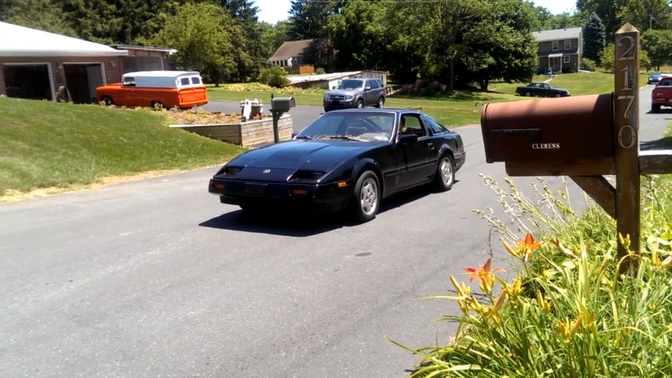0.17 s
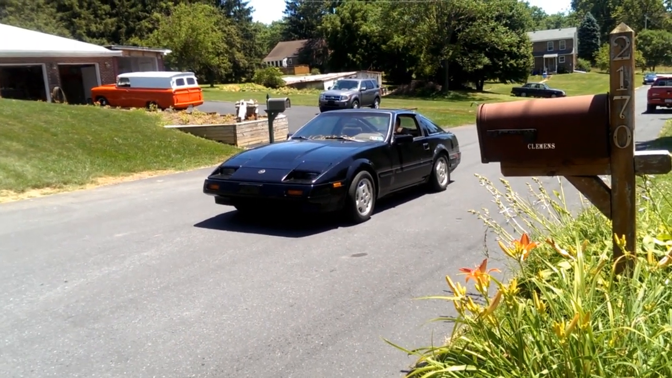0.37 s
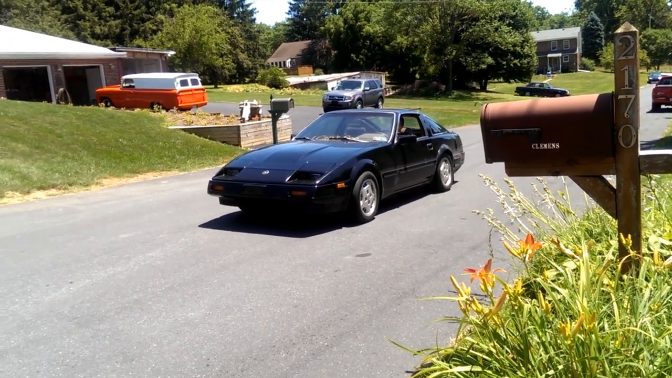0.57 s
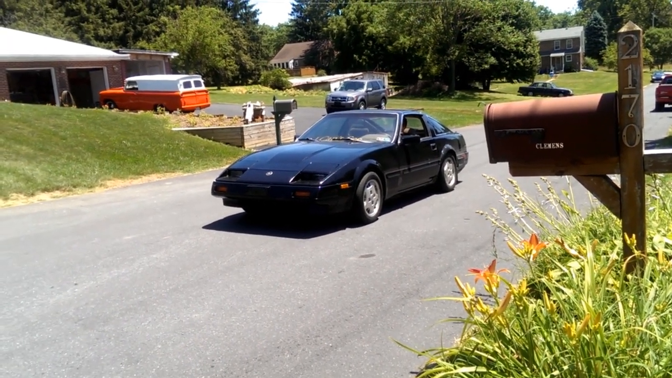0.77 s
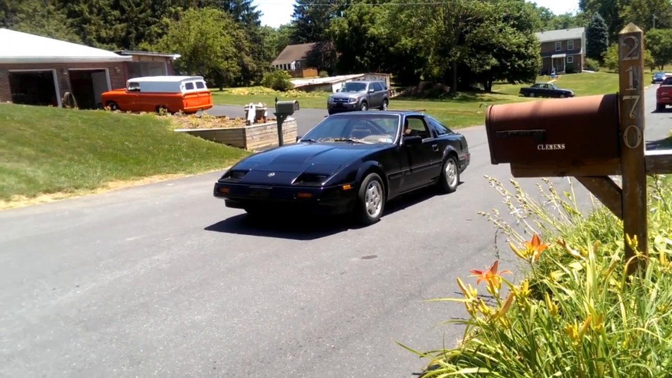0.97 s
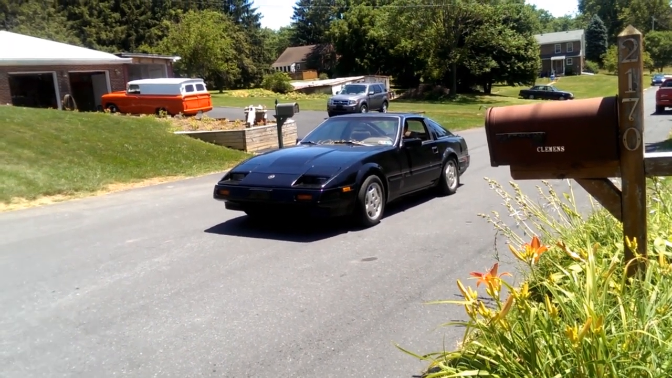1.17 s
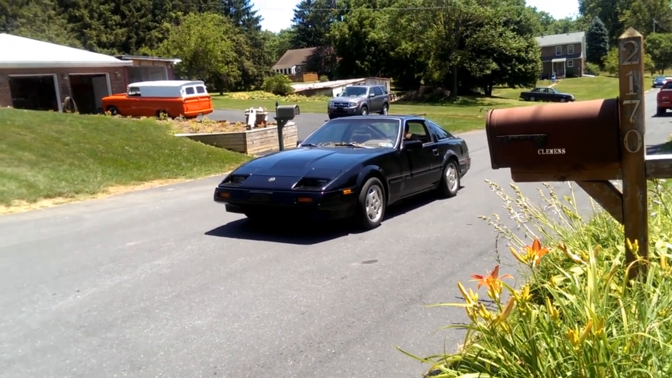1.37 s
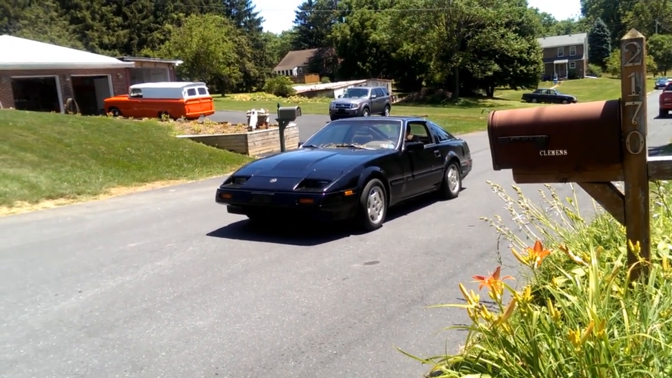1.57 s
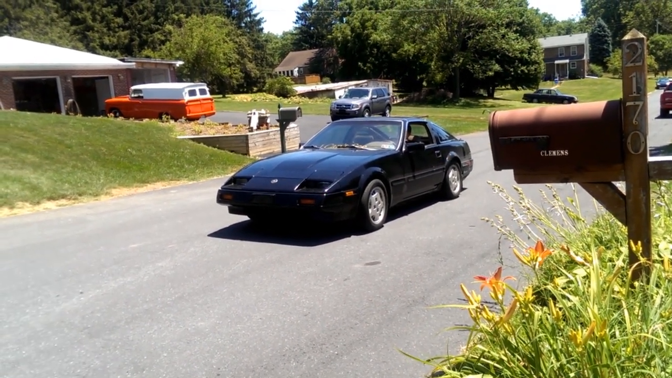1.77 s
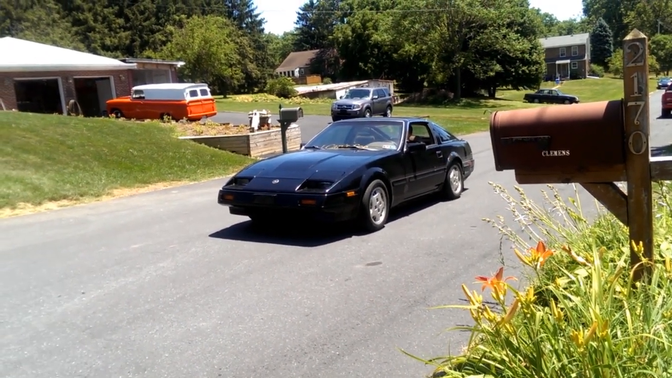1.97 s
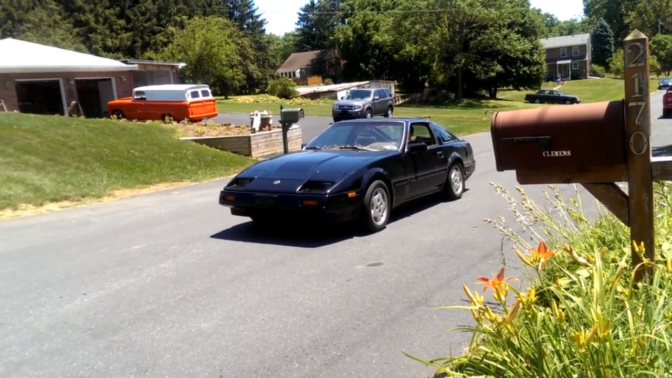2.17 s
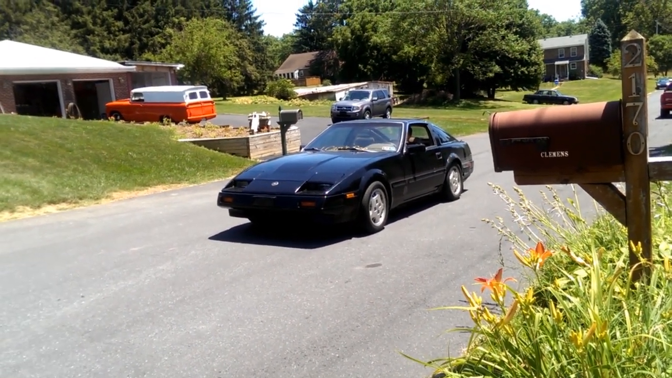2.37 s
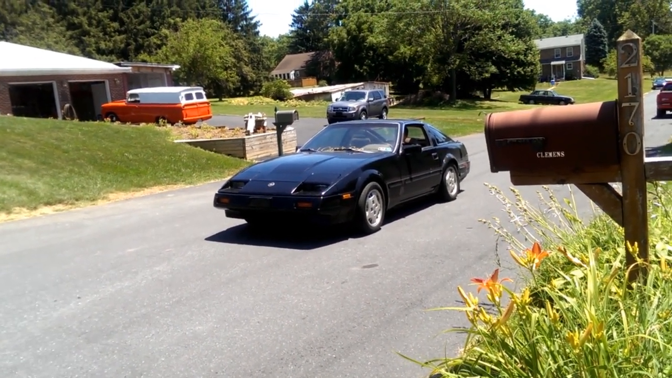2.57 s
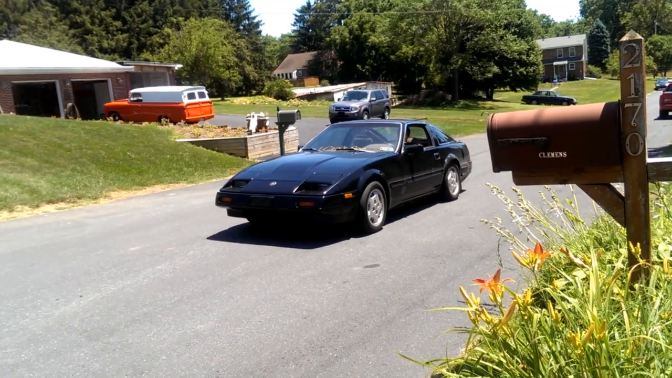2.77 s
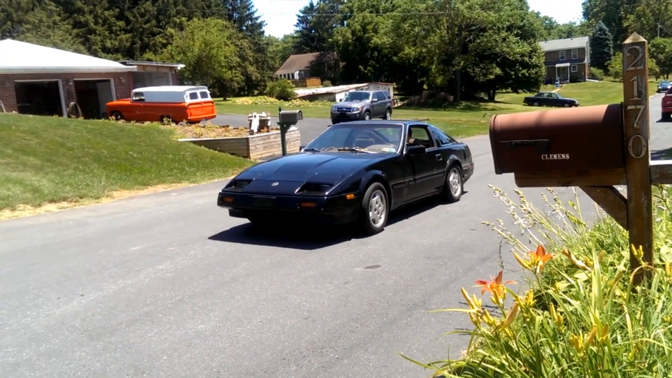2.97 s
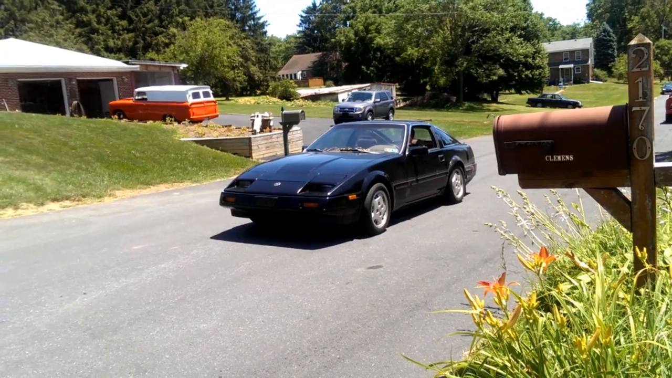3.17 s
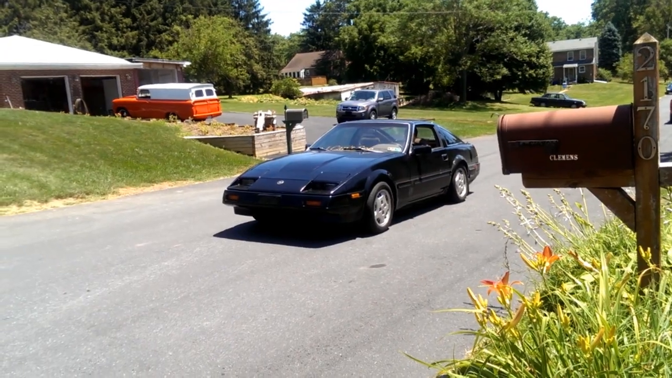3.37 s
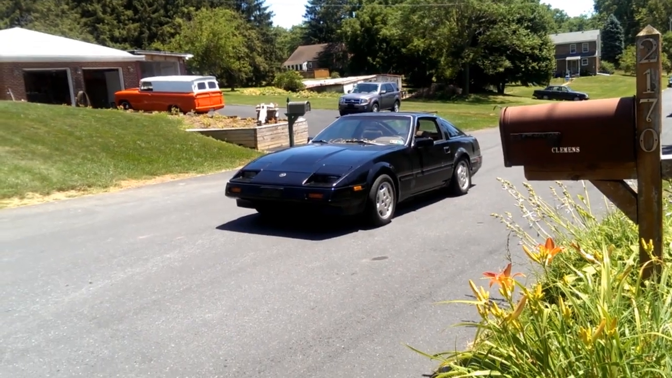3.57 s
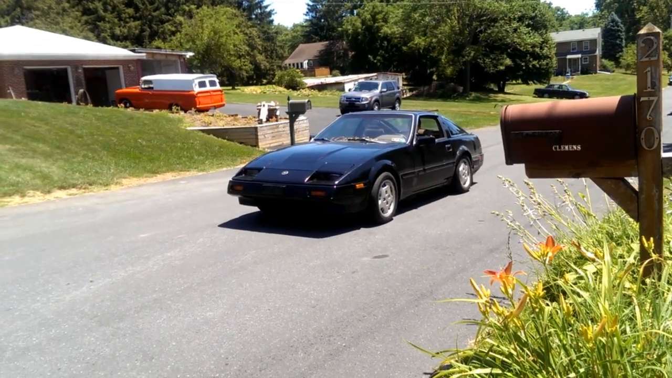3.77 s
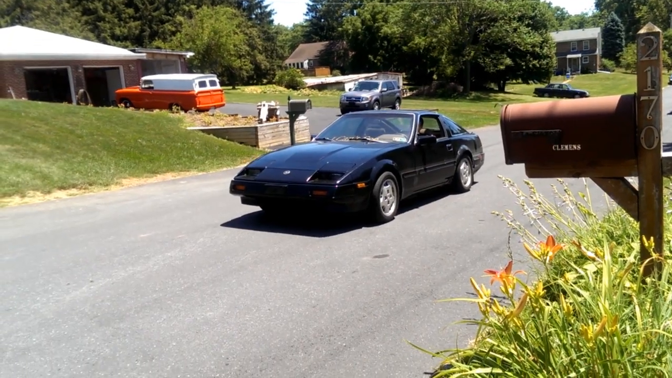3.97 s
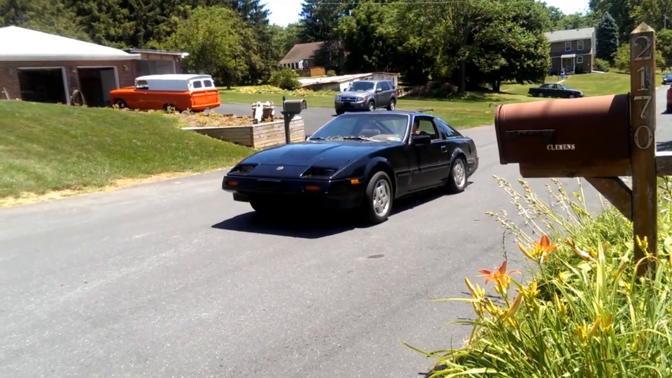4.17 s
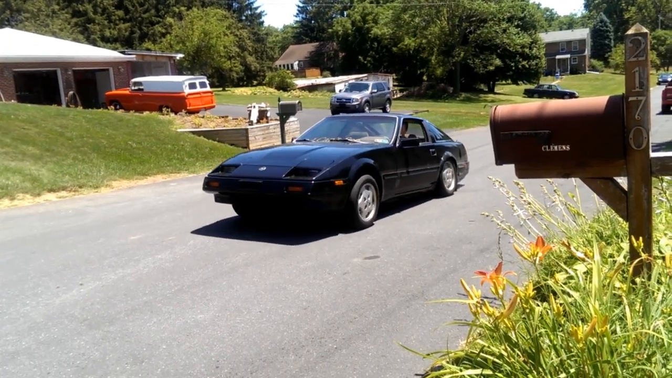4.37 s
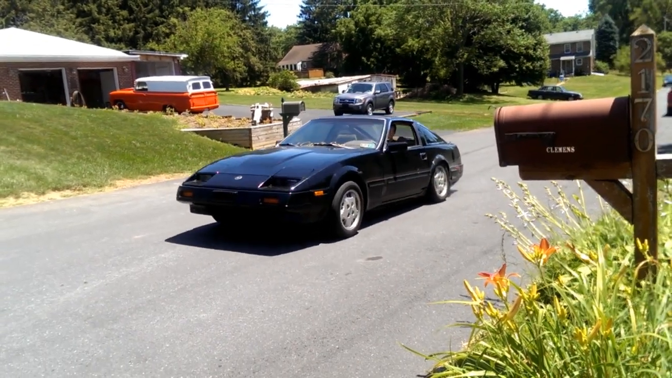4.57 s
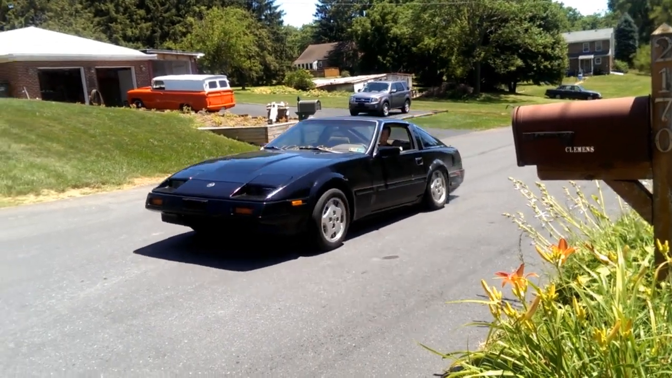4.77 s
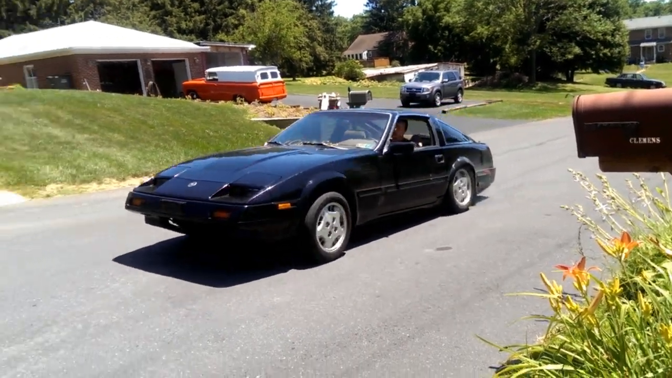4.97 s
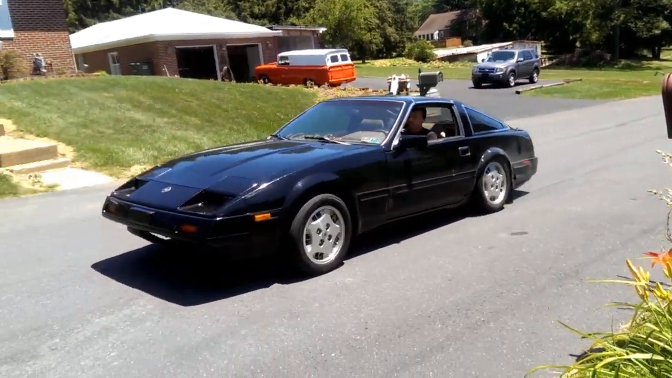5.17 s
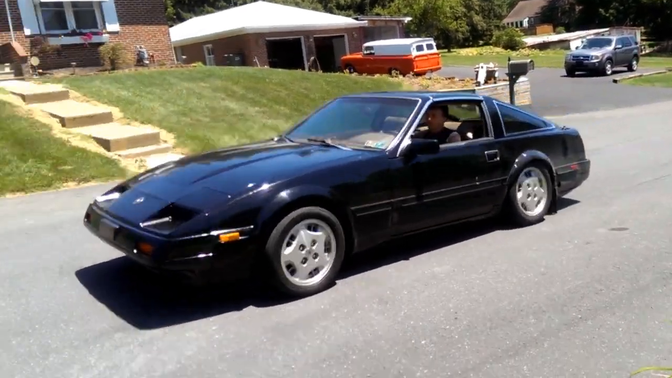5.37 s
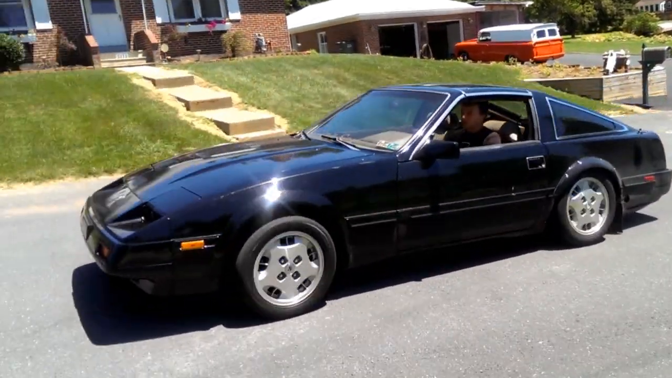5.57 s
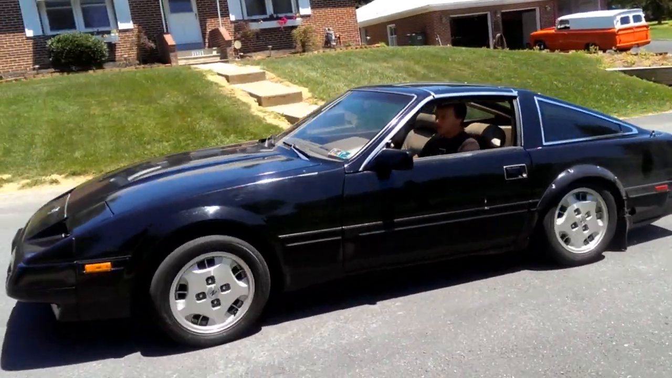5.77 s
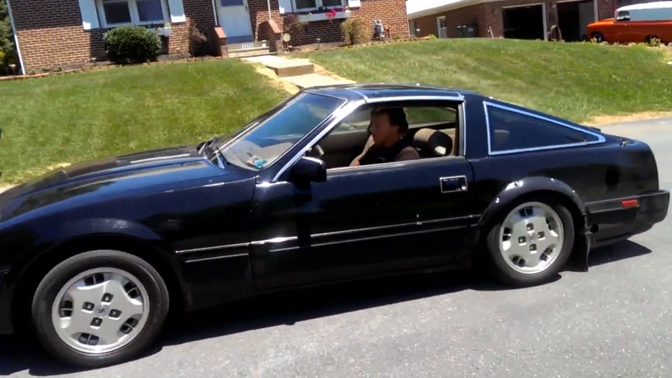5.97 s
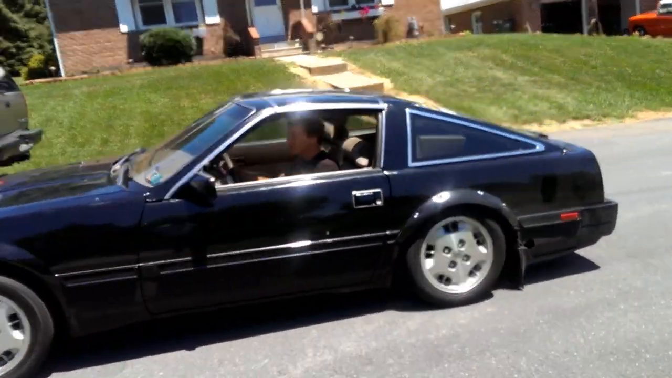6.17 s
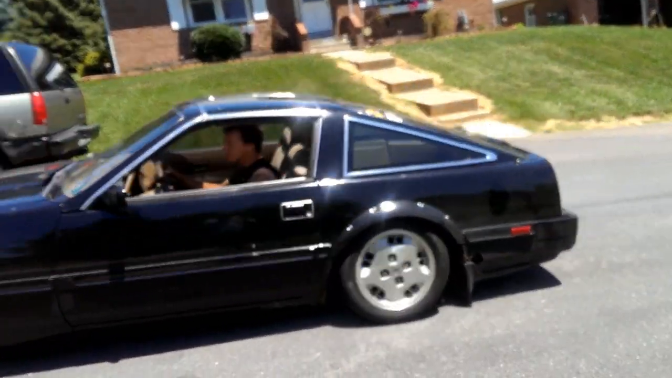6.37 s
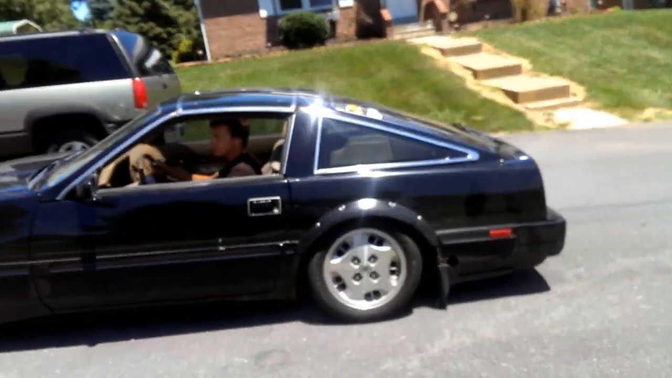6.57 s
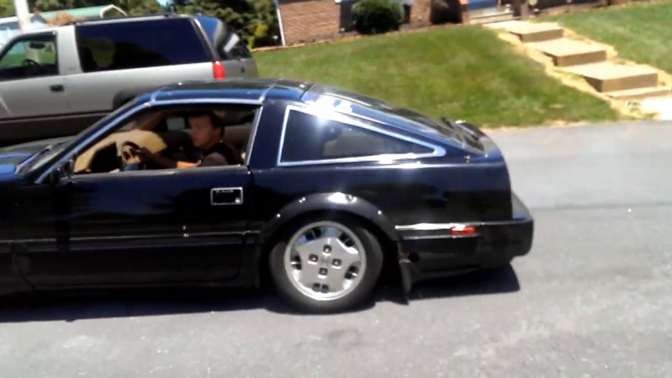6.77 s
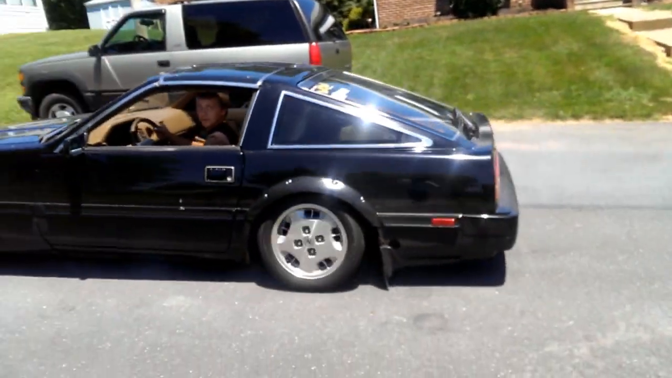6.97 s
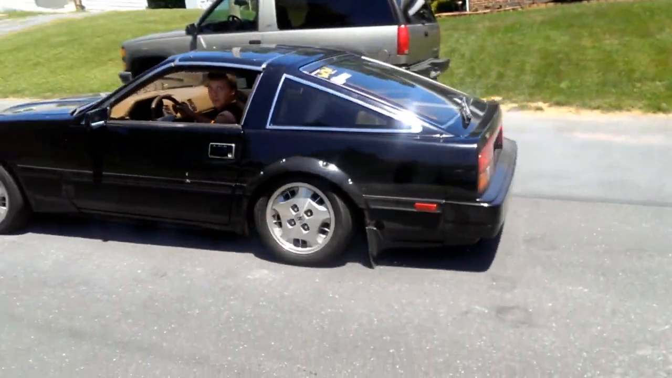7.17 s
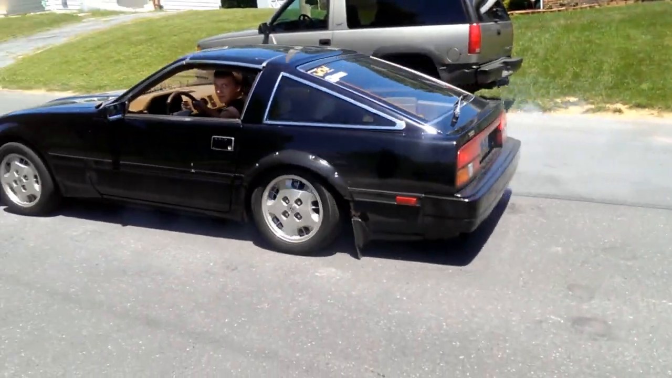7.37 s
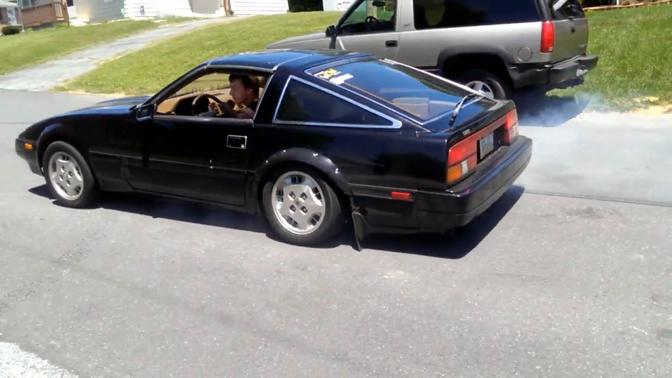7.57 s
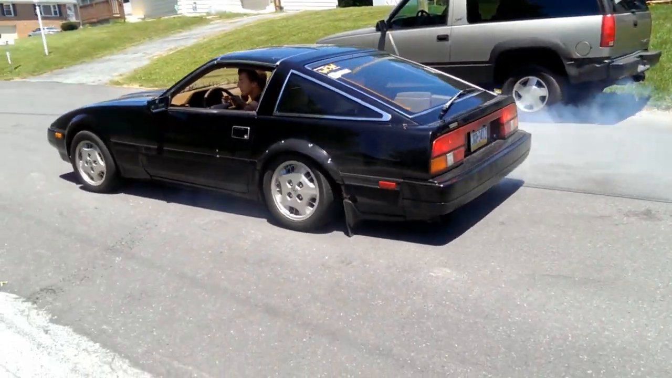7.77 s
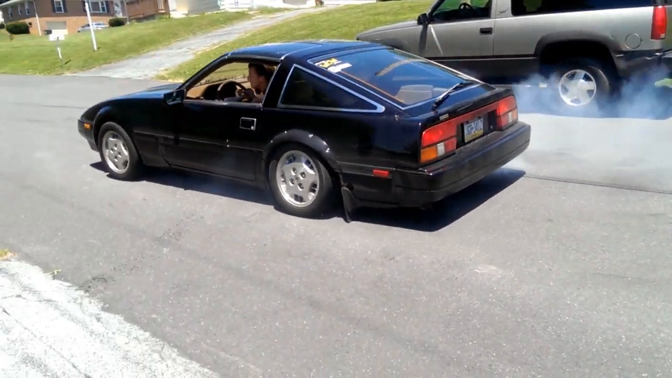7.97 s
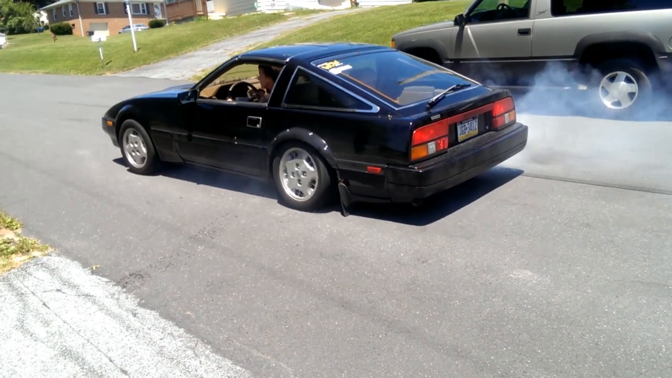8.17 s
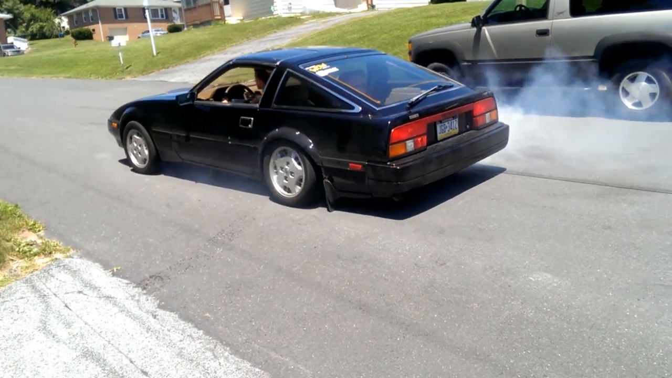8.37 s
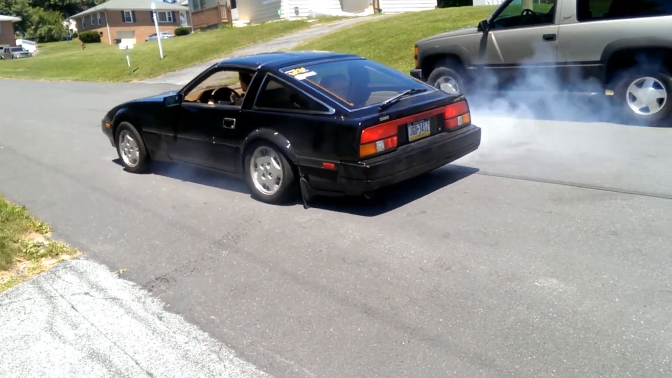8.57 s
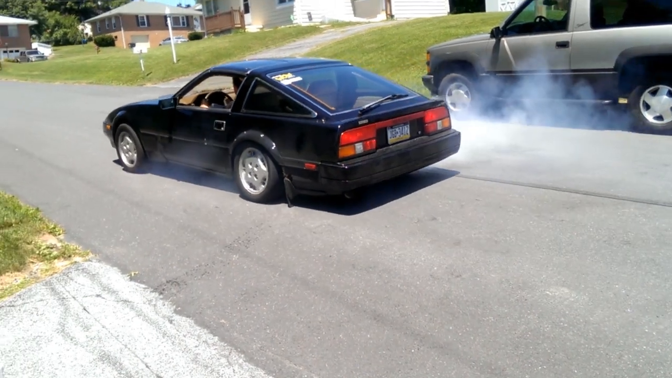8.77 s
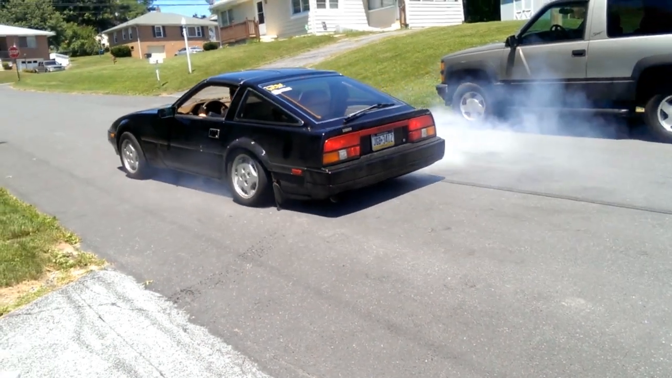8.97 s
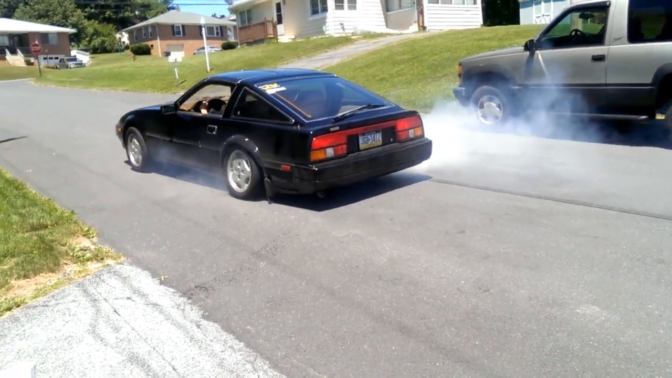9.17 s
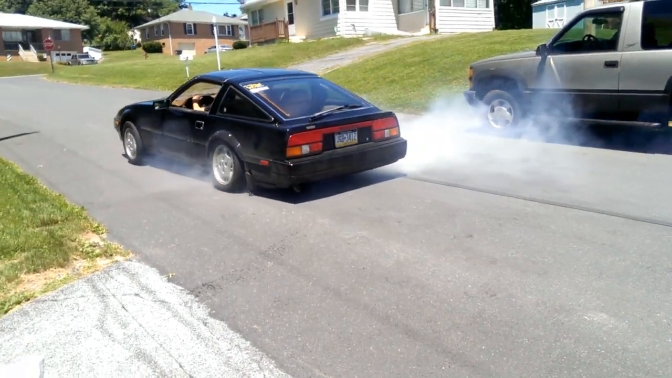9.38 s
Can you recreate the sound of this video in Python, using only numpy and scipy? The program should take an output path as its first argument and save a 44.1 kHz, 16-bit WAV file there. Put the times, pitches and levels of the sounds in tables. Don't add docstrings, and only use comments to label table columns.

```python
import sys
import numpy as np
from scipy import signal
from scipy.fft import rfft, irfft, next_fast_len
from scipy.io import wavfile
from scipy.ndimage import uniform_filter1d

SR = 44100
rng = np.random.default_rng(int(sys.argv[2]) if len(sys.argv) > 2 else 0)


def materialize(psi):
    bounded = np.clip(np.atleast_2d(psi).T, -1, 1)
    quanta = np.round(bounded * 32767).astype(np.int16)
    wavfile.write(sys.argv[1], SR, quanta)


def ratio(d):
    e = np.asarray(d, float) / 20
    return 10 ** e


N = 415422
STEP = 32

# f/Hz, level/dB
HISS_COLOUR = [(2000, -9), (5000, 0), (8000, -2.5), (12000, -2.5), (20000, 17.5)]
# t/s, length/s, depth/dB
STUMBLES = [
    (.05, .53, 11.5),
    (0.673, 0.23, 13.5),
    (1.06, 0.13, 15),
    (1.27, 0.21, 21),
    (1.56, 0.215, 17),
    (1.85, .35, 15),
    (2.294, 0.15, 15),
    (2.94, 0.15, 11),
]
# t/s, length/s, depth/dB, revs lost/Hz
LIFTS = [
    (7.252, 0.048, 4.5, 0.2),
    (7.461, 0.089, 7.5, 4),
    (7.723, 0.11, 5, 3),
    (8.019, 0.092, 13, 1),
    (8.131, 0.091, 2.5, 0),
    (8.23, .21, 8, 10),
    (8.746, 0.11, 8.5, 6.5),
    (9.111, .11, 11, 10.3),
]
LIFT_SHARE = 0.61, 0.14, 0.44, 0.58, 1.12
# t/s, boom/dB, upper orders/dB, thud/dB
JOLTS = [
    (4.06, 21, -21, -36),
    (4.2, 0, 2, -30),
    (8.055, -33, -7, -27),
]


def curves(table, edge_s=0.024):
    s, *columns = np.transpose(table)
    t = np.arange(N) / SR
    gate = np.clip(np.minimum(t - s[0] + edge_s, s[-1] + edge_s - t) / edge_s, 0, 1)
    return [np.interp(t, s, c) for c in columns] + [gate]


def over_hz(points):
    hz = np.fft.rfftfreq(next_fast_len(N), 1 / SR) + 1
    points = np.array(points)
    return np.interp(np.log(hz), np.log(points[:, 0]), points[:, 1])


def filtered(x, gain):
    size = next_fast_len(N)
    return irfft(rfft(x, size) * gain, size)[..., :N]


def lowpass(order, cutoff_hz):
    return signal.butter(order, cutoff_hz, fs=SR, output="sos")


def unit(x, lo_hz, hi_hz):
    sos = signal.butter(4, [lo_hz, hi_hz], "band", fs=SR, output="sos")
    band = signal.sosfilt(sos, np.atleast_2d(x)[0])
    return x / np.sqrt(np.mean(band ** 2))


def walk(rate, size=1):
    k = max(int(SR / rate / size), 1)
    held = np.repeat(rng.standard_normal(N // 20)[:N // size // k + 2], k)
    smooth = uniform_filter1d(uniform_filter1d(held, k), k)
    return 1.228 * smooth[:-(-N // size)]


def hump(s, rise, fall, hold=0):
    corners = [s - rise, s, s + hold + 1e-4, s + hold + fall + 2e-4]
    return np.interp(np.arange(N) / SR, corners, [0, 1, 1, 0])


def pair(points, grain_db):
    # f/Hz, common share/0-1
    likeness = [(60, .98), (600, 1), (1400, 0.85), (3100, 0.61), (6800, 0.32), (12000, 0.62)]
    a, b = rng.standard_normal((2, N)) * ratio(grain_db * walk(900))
    like = np.clip(over_hz(likeness), 0, 1)
    right = filtered(a, like) + filtered(b, np.sqrt(1 - like ** 2))
    return filtered(np.array([a, right]), ratio(over_hz(points)))


def tailpipe_aspect():
    # t/s, aspect/0-2
    turning = [
        (0, 0.061),
        (3.9, 0.027),
        (4.2, 0.9),
        (5, 0.3),
        (7.2, 0.95),
        (8.1, 1.98),
        (9.42, 1.74),
    ]
    return curves(turning)[0]


def lifted_db():
    close_s, open_s = 0.061, 0.075
    return sum(db * hump(s + close_s, close_s, open_s, max(length - close_s, 0))
               for s, length, db, _ in LIFTS)


def stumbling():
    fade_s, catch_s = .12, 0.034
    return [hump(s + fade_s, fade_s, catch_s, max(length - fade_s, 0)) for s, length, _ in STUMBLES]


def firing_rate():
    # t/s, firing rate of one bank of cylinders/Hz
    revs = [(0, 41), (.8, 50.5), (1.55, 52.8), (2.47, 51.8), (2.9, 60), (3.11, 58.3), (3.4, 62), (3.99, 87),
            (4.14, 94), (4.55, 99.8), (4.72, 107), (5.1, 109.2), (5.45, 106.2), (5.9, 106.2), (7.25, 116.2),
            (8.01, 104.5), (8.15, 91), (9.42, 97.5)]
    # t/s, gain/Hz, rise/s, fall/s
    flares = [
        (1.059, 10.5, .14, .45),
        (4.15, 3, 0.057, 0.0517),
        (4.801, 7, 0.072, 0.061),
        (4.93, -1.5, 0.073, 0.1203),
    ]
    lag_s, recover_s = .03, .4
    hz = curves(revs)[0] + sum(gain * hump(s, rise, fall) for s, gain, rise, fall in flares)
    for s, length, _, lost in LIFTS:
        hz -= lost * hump(s + length + lag_s, length + lag_s, recover_s)
    return hz


def engine():
    # t/s, level/dB, boom over it/dB, rasp over it/dB
    loudness = [(0, -35.5, -33, -17), (.65, -34, -30, -15), (.97, -26.5, -9.5, -14),
                (1.25, -34.5, -11.5, -7.5), (2.2, -31.5, -18.5, -13.5), (2.6, -36.5, -18, -11),
                (2.9, -32.5, -14, -9), (3.35, -31.5, -12, -11.5), (3.52, -28, -26, -5.5),
                (4.04, -30.5, -16, -2.5), (4.1, -22.5, -10.5, -5.5), (5.2, -22.5, -7, 7.5),
                (5.8, -19, -9.5, 6.5), (6.0, -17, -4, 6), (6.6, -15, -5.5, 3), (7.25, -17, 2.5, 6.5),
                (7.65, -10.5, -5, 0), (9.42, -13.5, -6, -0.5)]
    third_db = -8.5, -10, -4.5
    # t/s, half length/s, second order/dB, third order/dB
    nulls = [(.35, 0.44, 0.5, -7), (3.1, 0.26, 4.5, 9), (4.52, 0.1, 5.5, 0), (4.62, 0.085, -3.5, 12),
             (4.696, 0.035, 7, -5), (4.799, 0.14, 0.5, 17), (4.942, 0.22, 5, -0.5),
             (5.103, 0.28, -2.5, 5.5), (5.59, 0.36, 0, 8.5), (6.857, 0.27, 11.5, -1.5), (7.302, .3, 0.5, 4)]
    jolt_s = 0.017
    db, boom_db, rasp_db, _ = curves(loudness)
    lift_db, shapes = lifted_db(), stumbling()
    stumble_db = sum(shape * row[2] for shape, row in zip(shapes, STUMBLES))
    jolt_boom_db, jolt_db = (sum(row[k] * hump(row[0], jolt_s, jolt_s) for row in JOLTS) for k in (1, 2))
    null2_db, null3_db = (sum(row[k] * hump(row[0], row[1], row[1]) for row in nulls) for k in (2, 3))
    first = db + boom_db + 8.5 * sum(shapes) - LIFT_SHARE[0] * lift_db + jolt_boom_db
    second = db - stumble_db - LIFT_SHARE[1] * lift_db + jolt_db - null2_db
    third = db + np.interp(tailpipe_aspect(), range(3), third_db) - .4 * stumble_db
    third += jolt_db - LIFT_SHARE[2] * lift_db - null3_db
    return firing_rate(), first, second, third, db + rasp_db + jolt_db / 2


def low_orders(turns, levels_db):
    order_lag = 2.2, 2.07, .82
    tone = np.zeros(N)
    for k, db in enumerate(levels_db):
        level = np.sqrt(2) * ratio(db + .5 * walk(30))
        tone += level * np.sin(2 * np.pi * (k + 1) * turns + order_lag[k])
    return tone


def tailpipe_rasp(turns, hz, thump_db, rasp_db):
    # f/Hz, away/dB, sideways/dB, facing/dB
    tailpipe = [(170, 5.5, -19, -4), (292, -0.5, -19, -3), (346, -14, 4.5, -4.5), (435, -3, -4, -2.5),
                (493, -9, 1, -57), (528, -7, -1.5, -3.5), (738, -22.5, -0.5, -5.5), (956, -15, -7, -11),
                (1120, -8.5, -10.5, -20), (1390, -5.5, -15, -14.5), (1900, -5, -16, -21.5),
                (2605, -57, -16, -22)]
    # t/s, multiple of the firing rate
    ring = [
        (4.1, 7.3),
        (4.6, 5.6),
        (5.1, 5.6),
        (5.6, 7.3),
        (6.1, 5.8),
        (6.8, 7),
        (7.45, 8),
        (8.3, 7.2),
        (9.42, 8.1),
    ]
    # t/s, f/Hz
    cancel = [
        (4.9, 430),
        (5.8, 425),
        (6.3, 500),
        (6.7, 495),
        (7.0, 460),
        (7.42, 565),
        (7.75, 470),
        (8.3, 515),
        (9.42, 500),
    ]
    ring_order, ring_gate = curves(ring, edge_s=0.18)
    cancel_hz, cancel_gate = (c[::STEP] for c in curves(cancel, edge_s=0.066))
    slow = (hz, tailpipe_aspect(), ring_order * hz, ring_gate, thump_db, rasp_db, lifted_db())
    hz, aspect, ring_hz, ring_gate, thump_db, rasp_db, lift_db = (c[::STEP] for c in slow)
    rows, *colours = np.transpose(tailpipe)
    shares = [np.clip(1 - np.abs(aspect - k), 0, 1) for k in range(3)]
    away, _, facing = shares
    rough = 0.024 + 0.025 * np.clip(1 - hz / 70, 0, 1) * 4
    rasp, coarse = 0, np.arange(0, N, STEP)
    for order in range(4, 25):
        here_hz = order * hz
        db = sum(share * np.interp(here_hz, rows, colour) for share, colour in zip(shares, colours))
        db += ring_gate * 6 / (1 + ((here_hz - ring_hz) / 130) ** 2)
        db -= cancel_gate * 18 / (1 + ((here_hz - cancel_hz) / 38) ** 2)
        db -= lift_db * np.minimum(here_hz / 840, 1)
        db -= away * 2 * max(order - 11, 0)
        db += (1.1 + .07 * order) * walk(5, size=STEP) + (1.8 + 2 * away) * walk(45, size=STEP)
        muffled = away * np.clip((420 - here_hz) / 90, 0, 1)
        db += muffled * thump_db + (1 - muffled) * (rasp_db - 8.5)
        drift = 0.45 * order + (1.26 - 0.45 * facing) * walk(3, size=STEP)
        drift += rough * order * walk(50, size=STEP)
        envelope = np.interp(np.arange(N), coarse, ratio(db) * np.exp(1j * drift))
        rasp = rasp + (envelope * np.exp(2j * np.pi * order * turns)).imag
    return rasp


def exhaust():
    hz, first_db, second_db, third_db, rasp_db = engine()
    turns = np.cumsum(hz * (1 + 0.002745 * walk(25))) / SR
    lope = np.cos(2 * np.pi * turns / 3)
    tone = low_orders(turns, [first_db, second_db, third_db])
    tone *= 1 + (0.0043 + 0.062 * np.clip(1 - tailpipe_aspect(), 0, 1)) * lope
    thump_db = 20 * np.log10(ratio(second_db) + ratio(third_db)) - 14
    rasp = tailpipe_rasp(turns, hz, thump_db, rasp_db)
    return tone + rasp * (1 + 0.37 * lope), turns


def noisy(load, colour, turns, grain_db, hiss_grain_db, puff, gain_db, calm):
    roar_db, hiss_db, gate = load
    beat = 1 + puff * np.cos(4 * np.pi * turns) + 0.06 * np.cos(2 * np.pi * turns / 3)
    beat += 0.17 * np.clip(tailpipe_aspect() - 1, 0, 1) * np.cos(2 * np.pi * turns + 0.94)
    roar = unit(pair(colour, grain_db), 1300, 4500)
    lows = signal.sosfiltfilt(lowpass(2, 1100), roar)
    swell_db = roar_db - np.median(roar_db[gate > 0])
    roar += lows * (ratio(-calm * swell_db) - 1)
    hiss = unit(pair(HISS_COLOUR, hiss_grain_db), 10150, 14400)
    hiss *= ratio(hiss_db - 11.5 + 0.88 * walk(8.7))
    return (roar * ratio(0.27 * walk(14)) + hiss) * beat * gate * ratio(roar_db + gain_db)


def bay_load():
    # t/s, level/dB, intake hiss over it/dB
    clatter = [
        (0, -60.5, -7),
        (.55, -56.5, -12.5),
        (1.1, -52, -5.5),
        (2.0, -53, -7),
        (2.62, -54, -12),
        (3.12, -55, -3.5),
        (3.37, -55, -7),
        (3.6, -45.5, -19),
        (4.05, -43, -19),
    ]
    # t/s, gain/dB
    gasps = [
        (.98, 13.5),
        (1.87, 1.5),
        (2.64, 4.5),
        (3.65, 0),
    ]
    db, hiss_db, gate = curves(clatter)
    slack = sum(stumbling())
    gasp_db = sum(gain_db * hump(s, .1, 0.11) for s, gain_db in gasps)
    return db - slack + gasp_db, hiss_db + 7 * slack, gate


def engine_bay(turns):
    # f/Hz, level/dB per Hz
    colour = [(30, -5), (150, 8), (290, 4.5), (345, -21), (450, -9.5), (580, 4.5), (760, -4.5),
              (1150, -4.5), (1500, -8), (2600, -5), (4000, -11), (6500, -26), (16000, -29)]
    return noisy(bay_load(), colour, turns, grain_db=1.5, hiss_grain_db=0.5, puff=0.023, gain_db=5.0, calm=0.72)


def wind():
    gusts = rng.standard_normal((2, N)) * ratio(np.array([[0], [8]]) + 3 * walk(3))
    return unit(signal.sosfilt(lowpass(2, 70), gusts), 20, 100) * ratio(-55)


def thuds():
    thud_s = 0.014
    return sum(ratio(row[3]) * np.sin(np.pi / 2 * hump(row[0], thud_s, thud_s)) ** 2 for row in JOLTS)


def tyre_load():
    # t/s, roar/dB, hiss over it/dB
    spin = [
        (4.06, -48.5, 1),
        (4.09, -24, -2),
        (5.95, -21.5, 4),
        (6.75, -22, 7.5),
        (7.66, -25.5, 4),
        (8.0, -29, 5.5),
        (8.55, -31, 5),
        (9.08, -30.5, 6),
        (9.42, -29, 0.5),
    ]
    db, hiss_db, gate = curves(spin)
    lift_db = lifted_db()
    return db - LIFT_SHARE[3] * lift_db, hiss_db - LIFT_SHARE[4] * lift_db, gate


def tyres(turns):
    # f/Hz, level/dB per Hz
    colour = [(30, -20), (150, 1.5), (350, -3), (700, 1.5), (1100, 3), (1500, 1.5), (2100, 5), (3800, 3),
              (6000, -8), (16000, -18)]
    return noisy(tyre_load(), colour, turns, grain_db=1.0, hiss_grain_db=2.5, puff=0.022, gain_db=1.45, calm=0.76)


def cracks(turns):
    roar_db, hiss_db, gate = tyre_load()
    count = np.arange(1, int(2 * turns[-1]))
    second = count % 2
    chance = rng.standard_normal((4000, 2))[:len(count)]
    when = count // 2 + .42 * second + .02 * chance[:, 0]
    place = np.interp(when, turns, np.arange(N)).astype(int)
    snap = np.zeros(N)
    snap[place] = ratio(6.1 * np.clip(chance[:, 1], -3, 2) - 9.0 * second)
    burst = signal.lfilter([1], [1, -.97], snap) * rng.standard_normal(N)
    burst = unit(filtered(burst, ratio(over_hz(HISS_COLOUR))), 10000, 13540)
    facing = np.clip(tailpipe_aspect() - .8, 0, 1)
    load_db = np.minimum(hiss_db, 0)
    return burst * facing * gate * ratio(roar_db + hiss_db + load_db - 11.0)


def squeal():
    # t/s, pitch f/Hz, glide/Hz per s, length/s, level/dB
    chirps = [(4.22, 1010, -900, .04, -27), (4.3, 1200, 0, .015, -31), (4.368, 1080, -1500, .016, -22),
              (4.435, 1960, 900, .025, -21), (4.468, 1060, 3500, .02, -21), (4.54, 1095, -500, .016, -20),
              (4.575, 1990, 0, .015, -25), (4.505, 1090, 1500, .015, -26), (4.592, 1025, 600, .022, -21),
              (4.67, 1020, 0, .015, -21), (4.715, 1040, 2000, .012, -27), (4.735, 1190, 0, .01, -28),
              (4.89, 1060, 900, .018, -25), (4.975, 1090, -3000, .016, -27), (5.05, 1030, 0, .01, -26),
              (5.12, 1090, 0, .015, -27), (6.55, 1900, 0, .05, -27), (6.55, 1005, 60, .08, -33),
              (6.72, 1890, 0, .05, -26), (6.86, 1365, 50, .07, -27), (6.95, 2400, 200, .1, -31)]
    t, out = np.arange(N) / SR, np.zeros(N)
    flutter, wobble = ratio(2.5 * walk(90)), .8 * walk(150)
    for s, hz, glide, length, db in chirps:
        part = slice(int((s - .25) * SR), int((s + .25) * SR))
        dt = t[part] - s
        swell = ratio(db + 2.5) * np.exp(-.5 * (dt / length) ** 2)
        out[part] += swell * np.sin(2 * np.pi * dt * (hz + glide * dt / 2) + wobble[part])
    return out * flutter


def scene():
    pipe, turns = exhaust()
    near = pipe + engine_bay(turns) + wind() + thuds() + tyres(turns) + cracks(turns) + squeal()
    near = near * ratio(4.5)
    total = uniform_filter1d(near[0] ** 2, 4096) ** .5
    return near * (1 + 0.77 * total)


def roll_off(x):
    return signal.sosfilt(signal.butter(12, 15710, fs=SR, output="sos"), x)


def record(dry):
    # f/Hz, level/dB
    port_ring = [(20, 2), (60, 3.5), (7000, -3.5), (10000, -1.5), (12200, 6.5), (13500, -2.5), (15500, -19),
                 (20000, -5)]
    # f/Hz, level/dB
    covered_port = [(60, -17.5), (1300, -17), (4400, -16), (6000, -10.5), (8100, -7.5), (15000, -6)]
    ceiling, hardness = 0.52, 3.2
    left, right = dry[0], filtered(dry[1], ratio(over_hz(covered_port)))
    body = signal.sosfiltfilt(lowpass(1, 4500), left)
    squeezed = body / (1 + np.abs(body / ceiling) ** hardness) ** (1 / hardness)
    left = left - body + squeezed
    both = filtered(np.array([left, right]), ratio(over_hz(port_ring)))
    return roll_off(np.clip(both, -1, 1))


dry = scene()
out = record(dry)
materialize(out)
```